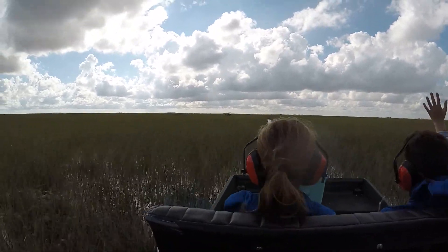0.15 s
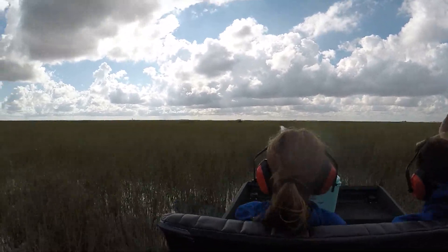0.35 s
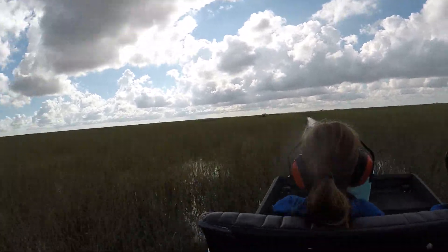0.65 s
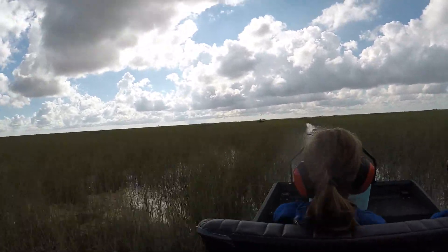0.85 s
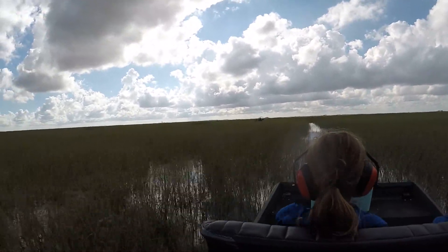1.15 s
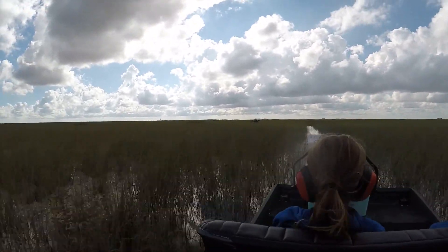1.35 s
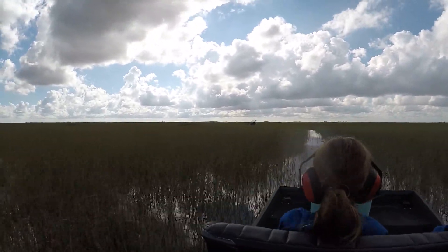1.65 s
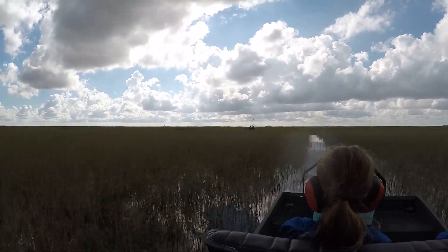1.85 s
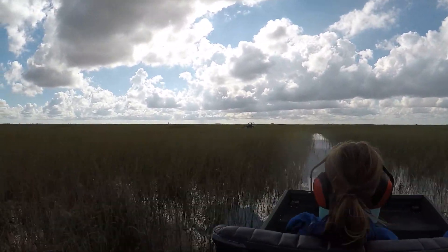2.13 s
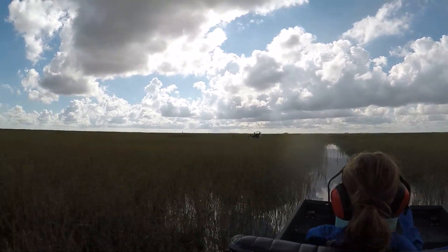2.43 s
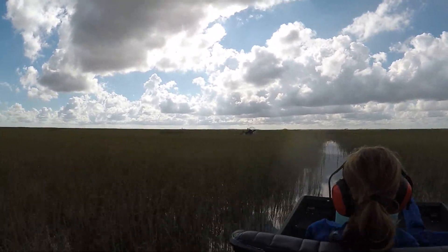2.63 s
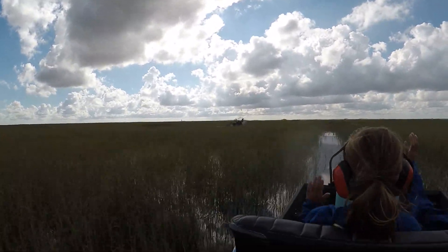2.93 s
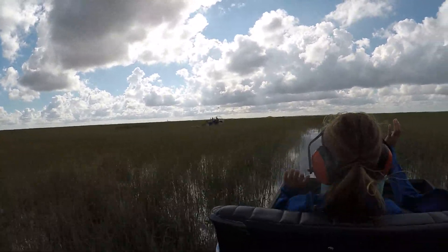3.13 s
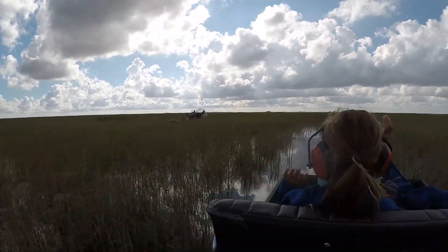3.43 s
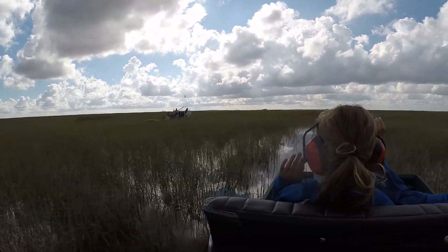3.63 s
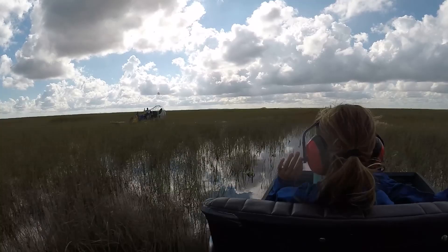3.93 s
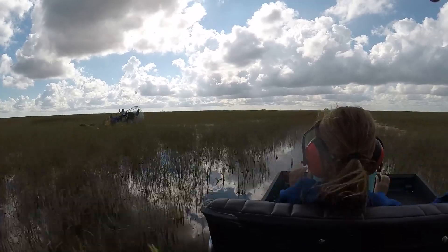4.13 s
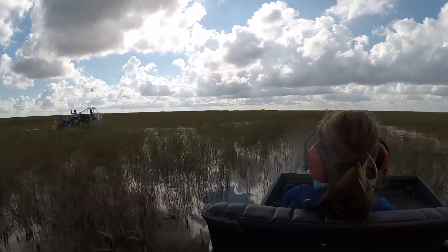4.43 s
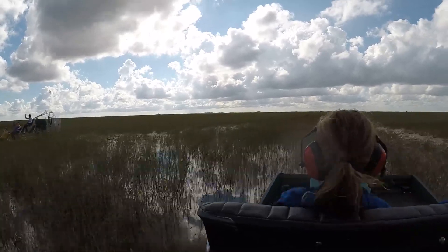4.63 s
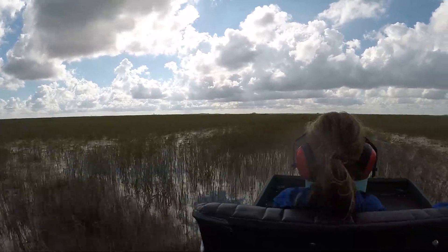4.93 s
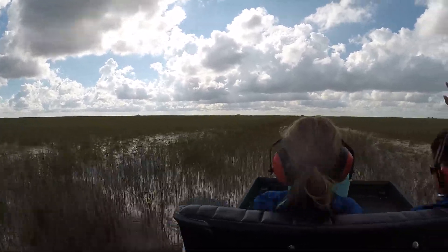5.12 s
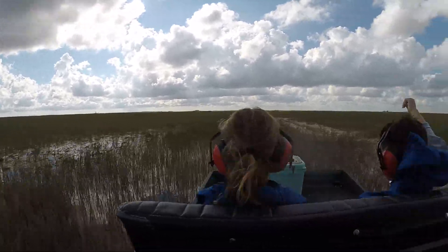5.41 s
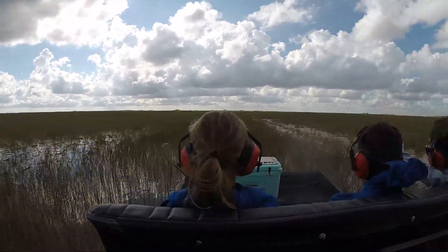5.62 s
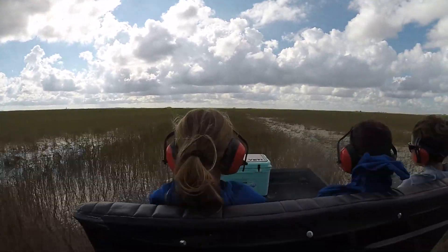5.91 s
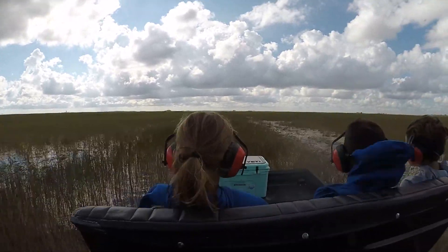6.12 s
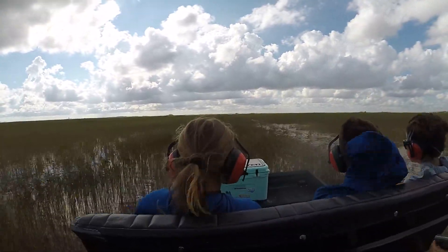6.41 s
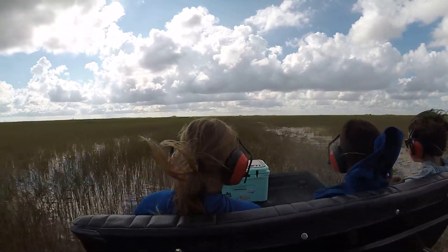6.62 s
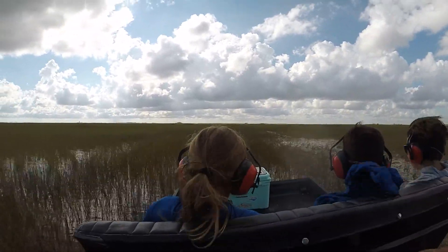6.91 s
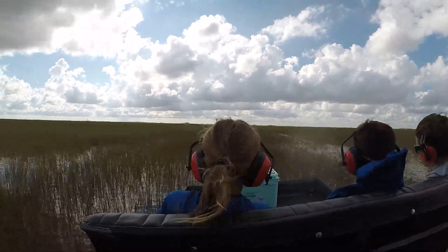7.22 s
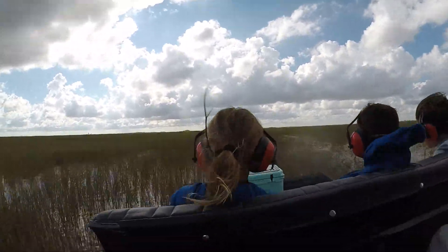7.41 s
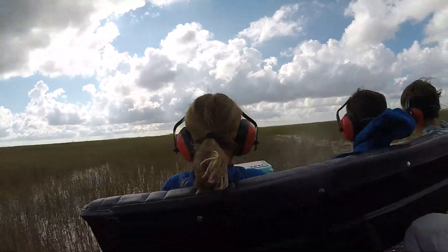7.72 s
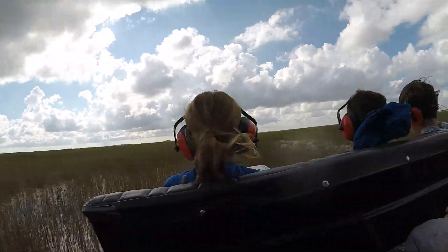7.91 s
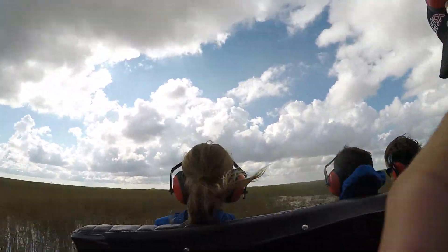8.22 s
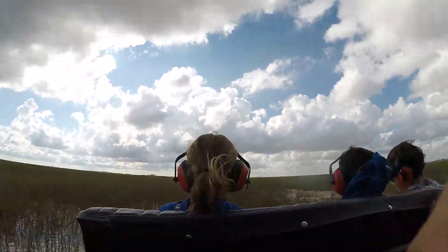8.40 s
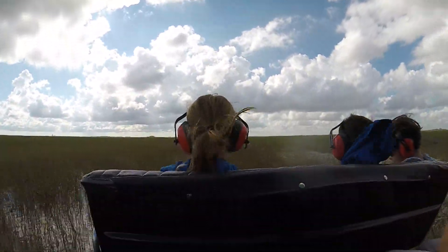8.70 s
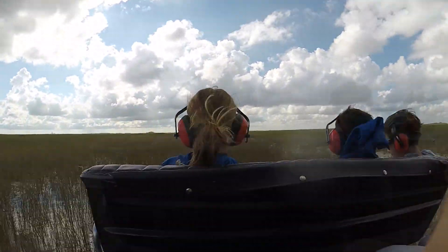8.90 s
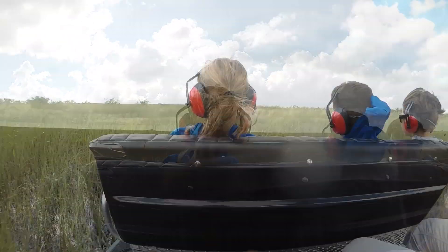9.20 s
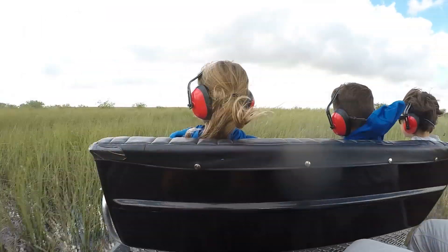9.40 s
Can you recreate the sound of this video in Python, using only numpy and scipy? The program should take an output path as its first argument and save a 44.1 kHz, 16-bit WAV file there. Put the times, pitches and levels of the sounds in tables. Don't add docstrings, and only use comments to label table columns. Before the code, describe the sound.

Close, muffled airboat hum running evenly across open marsh, buffeted by rough headwind puffs, then a tiny silent cut to gustier crackling air.

```python
import sys
import numpy as np
from scipy import signal
from scipy.fft import rfft, irfft
from scipy.io import wavfile
from scipy.ndimage import uniform_filter1d

SR = 44100
rng = np.random.default_rng(int(sys.argv[2]) if len(sys.argv) > 2 else 0)


def to_wav(sig):
    pcm = np.clip(np.atleast_2d(sig), -1, 1) * 32767
    pcm = np.round(pcm).astype(np.int16)
    wavfile.write(sys.argv[1], SR, pcm.T)


def undo_db(level):
    steps = np.asarray(level, float) / 20
    return 10 ** steps


N = 421149
CUT_START_S, CUT_END_S = 9.2022, 9.2178

# start_s, level_db, turned_to_hull [0-1], dipped_below_seat [0-1]
CAMERA = [(0, -27.5, 0.8, 0.13), (.45, -25, 0.5, 0.05), (1.2, -27.5, 0, 0.1), (3, -27.5, .1, 0.03),
          (4.9, -27, .2, 0), (5.5, -27.5, 0.69, 0.03), (6.5, -27.5, 0.85, 0), (7.7, -27.5, 0.74, 0),
          (8.1, -25.5, 0.98, 0.6), (8.5, -27, .85, 0.92), (8.85, -27.5, 0.77, 1), (9.2, -30, .9, 0.9)]
# start_s, level_re_mean_db, gustiness [0-1]
HEADWIND = [(0, -4, .9), (.5, 1.5, 0.7), (.9, 0, 1), (1.5, 2.5, .95), (2.3, -2, 0.9), (2.85, 2, .95),
            (3.1, -3, .4), (4.2, -1, 0.7), (5.1, -1.5, .7), (5.4, 3.5, 1.05), (5.75, 1, 0.92),
            (6.1, 2.5, 0.83), (6.3, -3, 0.62), (6.9, 5.5, 1), (7.3, -3, 0.4), (7.5, 2, 1),
            (7.95, -2.5, 0.3), (9.2, -1.5, 1)]
# centre_s, rumble_lift_db, first_harmonic_loss_db,
# third_harmonic_loss_db, length_s
SLOW_BUFFETS = [(0.207, 2.5, 3, 4, 0.17), (0.576, -0.5, 2.5, 1.5, 0.39), (1.3, -7, -1.5, 8, .12),
                (1.546, -4, 4.5, 6, 0.11), (1.765, -0.5, 4.5, 7, 0.23), (2.1, 0.5, 9, 3, 0.27),
                (2.808, 2.5, 6, 2, 0.14), (3.319, 6.5, 17, 1.5, 0.28), (3.7, -3, -1, -2, .1),
                (4.2, -3, 1, 3.5, .15), (4.45, -1, 5.5, -1, .25), (5.162, -4, 3, 4, 0.11),
                (5.653, 2, 2, -3.5, .12), (6.17, -1.5, 3.5, 3, 0.086), (6.324, 1, -5, -1.5, 0.16),
                (6.614, 1.5, -2.5, 3, 0.18), (6.832, -1.5, -0.5, 5, .12), (7.044, -0.5, -1, 2, 0.33),
                (7.246, 2.5, -2, 1.5, .1), (7.785, 2.5, 9, 1, 0.158), (8.6, 7.5, 6, 0.5, 0.12),
                (8.718, -2.5, 7, 3, 0.088), (8.888, -2, -1.5, 18, 0.1), (9.026, -3.5, -7.5, 16, 0.1)]
# freq_hz, density_db [dB per Hz]
HISS_COLOUR = [(500, -12.5), (800, 4), (1100, 1), (1400, -2.5), (1800, -10), (2600, -24), (3500, -40.5)]
# freq_hz, density_db [dB per Hz]
FIZZ_COLOUR = [(800, -7), (1500, 4.5), (2200, 4), (3000, -3.5), (4500, -4), (6200, -10.5), (7000, -28),
               (9500, -53.5)]


def evened(x):
    return x / np.sqrt(np.mean(x ** 2) + 1e-20)


def curves(rows, t):
    s, *columns = np.transpose(rows)
    return [np.interp(t, s, c) for c in columns]


def wander(rate_hz, count):
    size = max(int(SR / rate_hz), 1)
    once = uniform_filter1d(rng.standard_normal(count), size)
    return evened(uniform_filter1d(once, size))


def add(mix, start_s, sound):
    part = mix[round(start_s * SR):][:len(sound)]
    part += sound[:len(part)]


def bumps(rows):
    out = np.zeros(N)
    for centre_s, length_s, height in rows:
        add(out, centre_s - length_s / 2, height * np.hanning(round(length_s * SR)))
    return out


def air(colour, size, patch_db):
    frames = 4 * N // size + 5
    hz = np.fft.rfftfreq(size, 1 / SR)
    a, b, patches = rng.standard_normal((frames, size // 2 + 1, 3)).T
    patches = uniform_filter1d(patches, size=7, axis=0)
    patches = evened(uniform_filter1d(patches, size=9, axis=1))
    f, db = np.transpose(colour)
    shape_db = np.interp(np.log(hz + 1), np.log(f), db, left=-60, right=-90)
    z = (a + 1j * b) * undo_db(shape_db[:, None] + patch_db * patches)
    x = signal.istft(z, nperseg=size, noverlap=3 * size // 4)[1][:N]
    return x, z, hz


def layer(colour, size, patch_db, lo_hz, hi_hz):
    x, z, hz = air(colour, size, patch_db)
    power = (abs(z) ** 2).mean(1)
    in_band = (hz >= lo_hz) & (hz <= hi_hz)
    return evened(x) * np.sqrt(power.sum() / power[in_band].sum())


def orders(table, turns, turned, flutter_db, slip_rad):
    out = []
    for k, ahead_db, turned_db in table:
        level_db = ahead_db + turned * (turned_db - ahead_db) + flutter_db * wander(7.7, N)
        phase = 2 * np.pi * (k * turns + rng.random()) + slip_rad * wander(12, N)
        out.append(undo_db(level_db) * np.cos(phase))
    return np.array(out)


def boat():
    # start_s, third_blade_harmonic_hz
    speed = [(0.0, 255.0), (0.18, 259.7), (0.74, 265.1), (1.74, 267.2), (4.82, 267.3), (5.61, 261.6),
             (6.1, 261.8), (6.18, 260.5), (8.79, 260.4), (9.2, 257.4)]
    # start_s, level_db
    hull_echo = [(0, -38), (.33, -27), (1.05, -27), (1.2, -31), (2.3, -30), (3.25, -27), (3.55, -33.5),
                 (3.9, -35.5), (5, -30.5), (5.4, -35), (6.1, -31.5), (7.4, -31), (7.7, -33.5), (8.55, -27),
                 (8.85, -33.5), (9.2, -35.5)]
    # blade_rate_harmonic, facing_ahead_db, turned_db
    blade_rows = [(1, 0.5, -3), (2, -6, -5), (3, -1, -2.5), (4, -15.5, -15.5), (5, -20.5, -7),
                  (6, -23, -29), (7, -31.5, -38.5), (8, -29.5, -28), (9, -33, -31), (10, -33.5, -39.5),
                  (11, -27, -29.5), (12, -36, -36), (13, -31, -34.5), (14, -40.5, -37), (15, -37, -37.5)]
    # four_stroke_cycle_order, facing_ahead_db, turned_db
    engine_rows = [(3, -7.5, -12.5), (5, -10, -8), (7, -13, -23), (8, -19.5, -24), (9, -15, -26.5),
                   (11, -25.5, -23), (15, -19.5, -23), (16, -33, -35), (18, -38.5, -36.5)]
    cycles_per_blade = 21 / 55
    t = np.arange(N) / SR
    third_hz, third_db = curves(speed, t)[0], curves(hull_echo, t)[0]
    level_db, turned, dipped = curves(CAMERA, t)
    turns = np.cumsum(third_hz / 3) / SR

    first_loss_db = bumps([(s, length_s, db) for s, _, db, _, length_s in SLOW_BUFFETS])
    third_loss_db = bumps([(s, length_s, db) for s, _, _, db, length_s in SLOW_BUFFETS])
    blades = orders(blade_rows, turns, turned, flutter_db=0.7, slip_rad=0.1)
    blades[0] *= undo_db(2.0 - first_loss_db)
    blades[2] *= undo_db(third_db - level_db + 5.0 + 0.2 * wander(6.4, N) - 0.86 * third_loss_db)
    blades[6:10] *= undo_db(10 * dipped)

    engine = orders(engine_rows, turns * cycles_per_blade, turned, flutter_db=1.5, slip_rad=0.2)
    engine[6] *= undo_db(8.4 * dipped)
    return (t < CUT_END_S) * undo_db(level_db) * (blades.sum(0) + engine.sum(0))


def wind():
    # centre_s, length_s, level_db
    wind_dips = [
        (1.63, .06, -8),
        (2.16, .06, -1.5),
        (2.95, 0.13, -6),
        (5.72, 0.058, -5),
        (5.9, 0.092, -2.5),
        (7.13, 0.12, -4),
        (9.17, 0.19, -6),
        (9.422, 0.035, -7.5),
        (9.507, 0.019, -4.5),
        (9.285, .04, -3.5),
    ]
    # freq_hz, density_db [dB per Hz]
    rumble_colour = [(15, -15.5), (30, -3), (60, -1.5), (90, -2.5), (140, -5), (220, -10.5), (320, -13),
                     (550, -31.5)]
    # freq_hz, density_db [dB per Hz]
    roar_colour = [(150, -7), (300, 10), (500, 5.5), (700, -1.5), (900, -7), (1200, -15.5), (1800, -28.5)]
    t = np.arange(N) / SR
    before_cut = t < CUT_END_S
    wind_db, gusty = curves(HEADWIND, t)
    dipped = curves(CAMERA, t)[2] * before_cut
    hush_db = bumps(wind_dips)
    drive_db = wind_db + 0.98 * wander(4.9, N) + hush_db

    def eddy_db(mean_db, headwind_share, after_cut_db):
        return np.where(before_cut, mean_db + headwind_share * drive_db, after_cut_db + hush_db)

    rumble_db = eddy_db(-35, 0.67, -33.5)
    roar_db = eddy_db(-49, 0.93, -43.5)
    hiss_db = eddy_db(-51, 0.24, -47.5)
    fizz_db = eddy_db(-59, 0.93, -63)

    gust = 0.5 * wander(40, N) + 1.0 * wander(260, N)
    gust += 0.17 * gust ** 2
    gust *= gusty
    rumble_db += bumps([(s, length_s, db) for s, db, _, _, length_s in SLOW_BUFFETS])

    rumble = undo_db(rumble_db + 0.73 * wander(4.0, N)) * layer(rumble_colour, 2048, 0.58, 25, 75)
    roar = undo_db(roar_db + 9 * dipped - 0.9 + 0.97 * gust) * layer(roar_colour, 512, 1.9, 560, 900)
    hiss = undo_db(hiss_db - 3 * dipped - 2.5 + 2.3 * gust) * layer(HISS_COLOUR, 512, 0.37, 1000, 1800)
    fizz = undo_db(fizz_db - 3.0 + 1.94 * gust) * layer(FIZZ_COLOUR, 256, 0.66, 2200, 6500)
    return rumble + roar + hiss + fizz


def body_shade(t):
    return np.clip((t - 5.25) / 0.15, 0, 1) * (1 - curves(CAMERA, t)[2])


def tip_swish():
    # freq_hz, density_db [dB per Hz]
    swish_colour = [(2000, -15), (3000, -7.5), (4000, -4.5), (5700, 6), (6400, -2.5), (7000, -21.5),
                    (8500, -45.5)]
    t = np.arange(N) / SR
    swish = undo_db(-68.5) * layer(swish_colour, 256, 0.6, 2200, 6500)
    swish[round(CUT_END_S * SR):] *= undo_db(-9.5)
    return swish * undo_db(-2.5 * body_shade(t))


def thin_hiss():
    # freq_hz, density_db [dB per Hz]
    thin_colour = [(6000, -7.5), (7000, 4.5), (8500, -1.5), (9500, -4.5), (11000, -16), (12500, -40.5)]
    t = np.arange(N) / SR
    shade = body_shade(t)
    level_db = -87 - 5 * shade + 0.5 * shade * curves(HEADWIND, t)[0]
    level_db = np.where(t < CUT_END_S, level_db, -100)
    return undo_db(level_db) * layer(thin_colour, 256, 1.1, 7600, 9500)


def puffs():
    # start_s, peak_db, body_re_peak_db
    puff_rows = [(0.158, -37, 2), (0.8944, -42, -1), (1.1363, -40.5, 7), (1.4985, -48, 16),
                 (1.9584, -41.5, 2), (2.0802, -46, 10), (2.1884, -43, -3), (2.2747, -39, 10),
                 (2.363, -39, 3), (2.4314, -38.5, 2.5), (3.3328, -40.5, 11), (4.129, -43, 4),
                 (5.2914, -42.5, 16), (5.4051, -37, 6), (5.5164, -38, -1), (5.5573, -43, 10),
                 (5.5927, -43, 0), (5.6331, -49.5, 5), (5.7284, -48, 0), (5.9838, -49.5, -1),
                 (6.0297, -40, -1), (6.4193, -43.5, 5), (6.5879, -32.5, 2), (6.8997, -39.5, 0),
                 (7.0509, -43, 5), (7.5288, -36.5, -7), (7.6954, -47.5, -4), (9.0039, -52, 7)]
    # start_s, peak_db, body_re_peak_db
    crackle_rows = [
        (9.2564, -51.5, 8),
        (9.315, -47, 1),
        (9.351, -40, -2),
        (9.363, -35.5, 7),
        (9.383, -42.5, 1),
        (9.44, -40.5, 6),
        (9.47, -47.5, -11),
    ]
    rise_s, fall_s = 0.0033, 0.012
    u = np.arange(0, 0.15, 1 / SR)
    swell = (1 - np.exp(-u / rise_s)) * np.exp(-u / fall_s)
    high, low = np.zeros(N), np.zeros(N)
    for start_s, peak_db, body_db in list(puff_rows) + list(crackle_rows):
        add(high, start_s, undo_db(peak_db - 11.0) * swell)
        add(low, start_s, undo_db(peak_db + body_db - 10) * swell)
    bright = high * layer(FIZZ_COLOUR, 256, 1.1, 2000, 7000)
    body = low * layer(HISS_COLOUR, 256, 1.4, 800, 2000)
    return bright + body


def whistles():
    # start_s, length_s, level_db
    whistle_rows = [
        (5.992, 0.078, -64),
        (6.1, 0.11, -63.5),
        (6.41, .03, -60),
        (6.45, .1, -63),
        (6.82, .06, -64),
        (6.893, 0.028, -56),
        (6.985, 0.031, -55),
        (7.033, .03, -53),
    ]
    # freq_hz, density_db [dB per Hz]
    port_colour = [(2900, -23.5), (3500, -4), (3900, -0.5), (4400, -4), (5300, -21.5)]
    swell = np.zeros(N)
    for start_s, length_s, db in whistle_rows:
        add(swell, start_s, undo_db(db) * np.hanning(round(length_s * SR)))
    return swell * layer(port_colour, 256, 1.2, 2900, 5300)


def gusts():
    # start_s, length_s, level_db, tilt_db [dB per octave]
    gust_rows = [
        (9.252, 0.0227, -41.5, 0.5),
        (9.295, 0.032, -41.5, -8),
        (9.333, .05, -35, -5.5),
        (9.396, 0.025, -42.5, -2),
        (9.427, 0.039, -35, 1.5),
        (9.46, .038, -37.5, 0.6),
        (9.523, .04, -35, -4.5),
    ]
    # centre_s, freq_hz, length_s, level_db
    shove_rows = [
        (9.26, 211.5, 0.11, -30.5),
        (9.294, 104.6, .07, -26.5),
        (9.367, 35.9, 0.089, -19),
        (9.466, 58.2, 0.087, -25.5),
        (9.53, 156.6, .06, -30),
    ]
    # freq_hz, density_db [dB per Hz]
    rush_colour = [(120, -19.5), (250, 8.5), (800, 0), (1500, -4), (2200, -10), (4000, -24.5), (6000, -38),
                   (7000, -60)]
    out = np.zeros(N)
    rush = layer(rush_colour, 256, 2.3, 500, 6000) * undo_db(2.5 * wander(400, N))
    for start_s, length_s, db, tilt_db in gust_rows:
        piece = rush[round(start_s * SR):][:round(length_s * SR)]
        hz = np.fft.rfftfreq(len(piece), 1 / SR)
        tilt = undo_db(tilt_db * np.log2(np.maximum(hz, 300) / 1000))
        piece = irfft(rfft(piece) * tilt, len(piece))
        add(out, start_s, undo_db(db) * piece * signal.windows.tukey(len(piece), 0.3))
    for centre_s, freq_hz, length_s, db in shove_rows:
        t = np.arange(round(length_s * SR)) / SR
        shove = np.hanning(len(t)) * np.sin(2 * np.pi * freq_hz * t)
        add(out, centre_s - length_s / 2, undo_db(db + 1) * shove)
    return out


def scene():
    return (boat() + wind() + tip_swish() + thin_hiss() + puffs() + whistles() + gusts())[None]


def limiter(dry):
    power_db = 10 * np.log10(abs(uniform_filter1d(dry[0] ** 2, size=500)) + 1e-12)
    fall_db = np.arange(N) * 140.0 / SR
    held_db = np.maximum.accumulate(power_db + fall_db) - fall_db
    over_db = np.maximum(held_db + 24, 0)
    x = dry * undo_db(1.5 - 0.53 * uniform_filter1d(over_db, size=235))
    soft = 0.17 * np.tanh(x / 0.19)
    low_pass = signal.butter(4, 900, fs=SR, output="sos")
    return x + signal.sosfiltfilt(low_pass, soft - x)


def small_clicks(x):
    # start_s, level_db
    step_rows = [(1.0955, -75), (1.1016, -55.5), (1.1057, -69.5), (1.112, -63), (5.62, -67), (5.624, -55),
                 (5.629, -54), (9.2015, -42.5), (9.2184, -55), (9.351, -63), (9.3942, -41.5),
                 (9.405, -57.5), (9.5495, -32.5)]
    for start_s, db in step_rows:
        add(x[0], start_s, undo_db(db) * np.exp(-np.arange(40) / 4.0))


def top_cut(x):
    return signal.sosfilt(signal.butter(12, 16000, fs=SR, output="sos"), x)


def record(dry):
    x = limiter(dry)
    small_clicks(x)
    t = np.arange(N) / SR
    outside_s = np.maximum(CUT_START_S - t, t - CUT_END_S)
    x = x * np.clip(outside_s / 0.00015, 0, 1)
    return top_cut(x)


dry = scene()
out = record(dry)
to_wav(out)
```